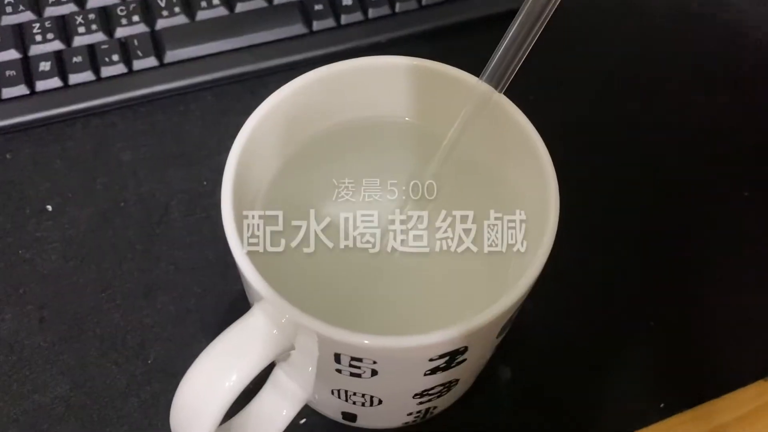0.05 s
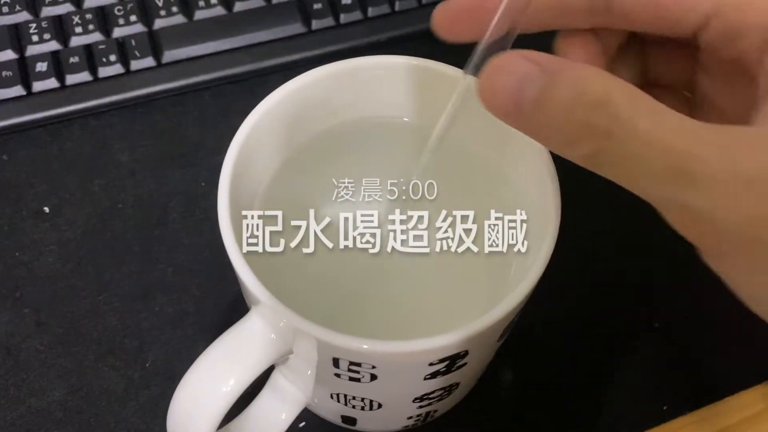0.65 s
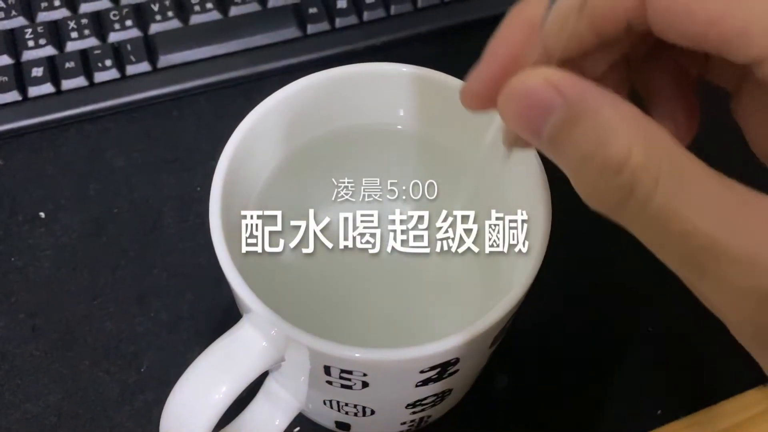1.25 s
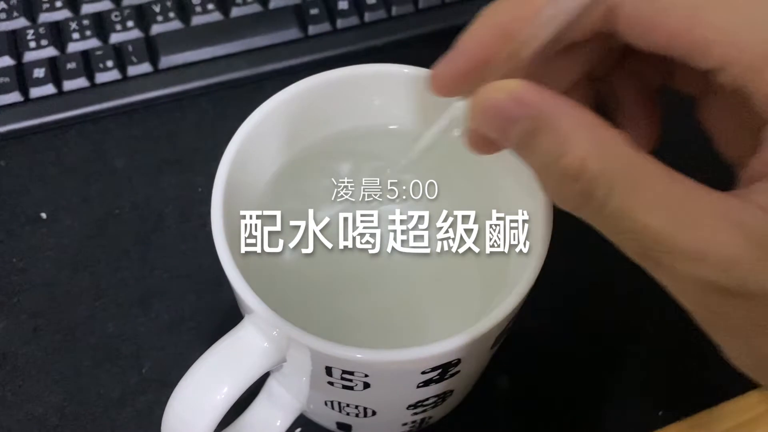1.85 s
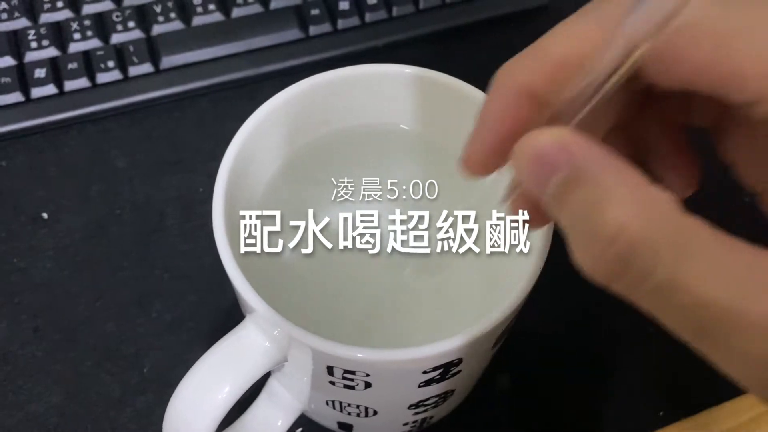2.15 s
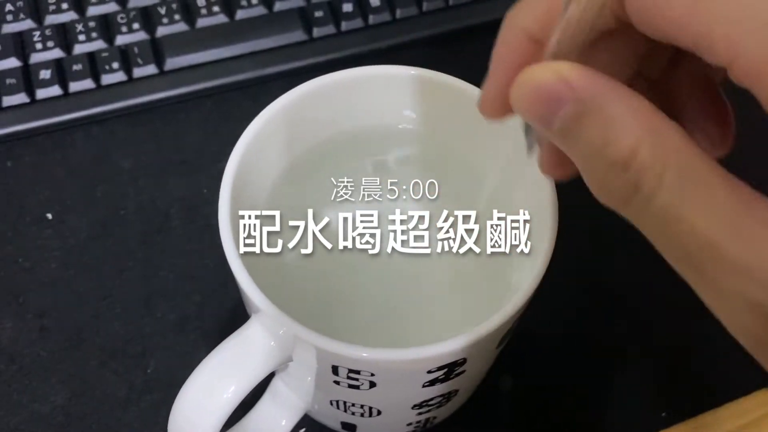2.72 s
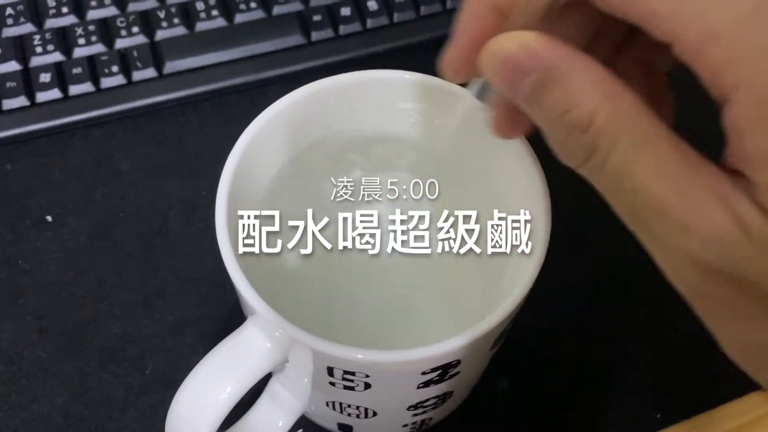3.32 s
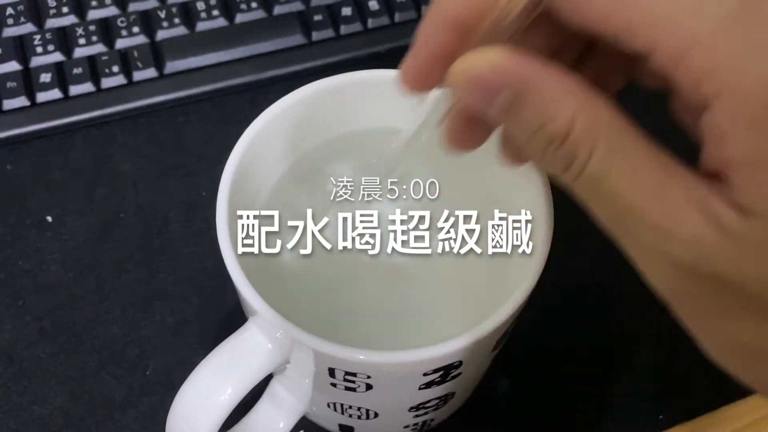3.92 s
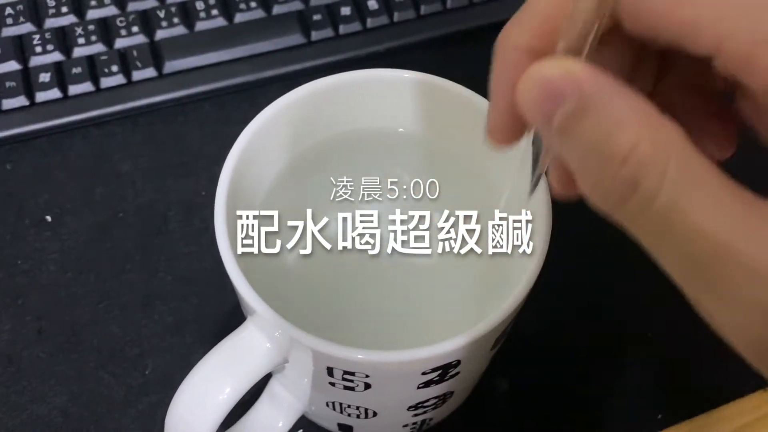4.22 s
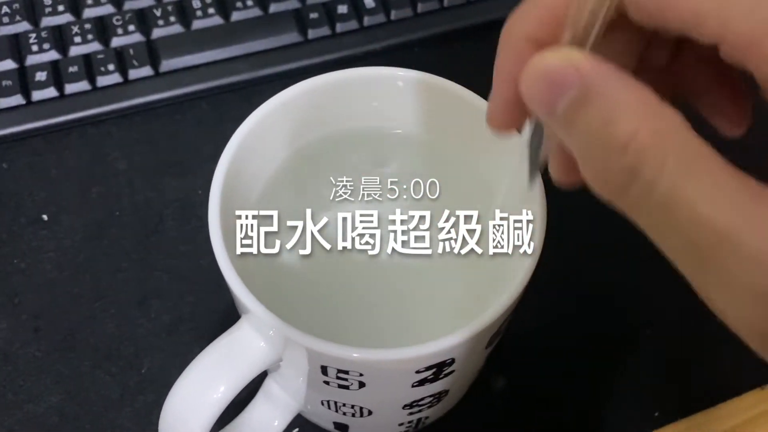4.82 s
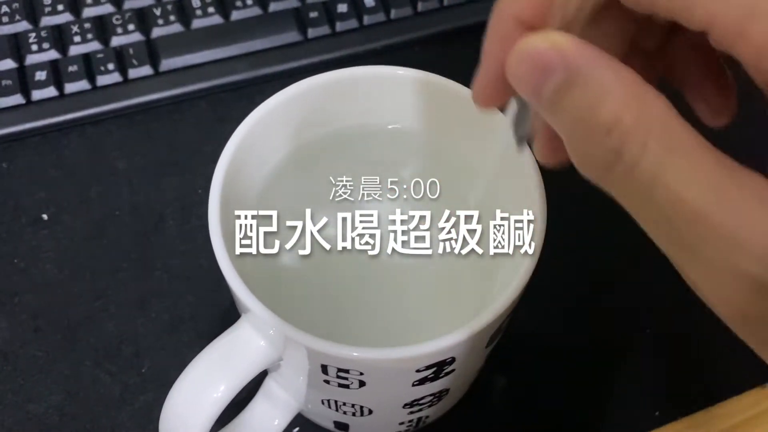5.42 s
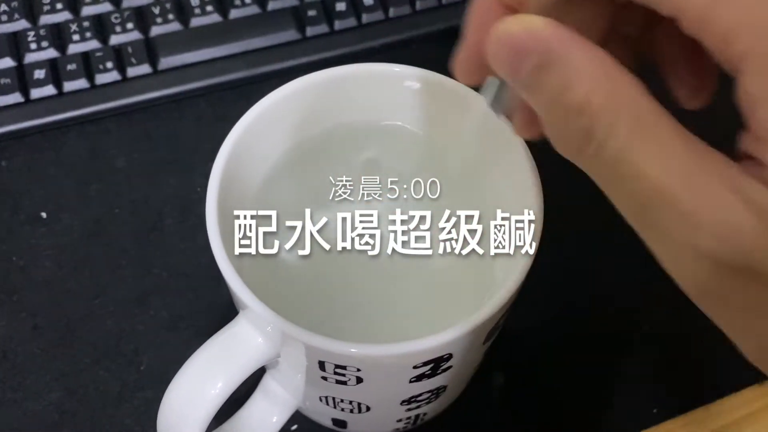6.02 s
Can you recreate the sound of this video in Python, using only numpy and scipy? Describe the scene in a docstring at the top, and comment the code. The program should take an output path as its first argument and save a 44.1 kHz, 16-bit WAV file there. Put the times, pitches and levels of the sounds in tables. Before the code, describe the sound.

Faint ventilation noise and electrical hum fill a quiet room, then a glass rod begins stirring in a ceramic mug close to the microphone. Light taps grow into a loose run of sharp, high clinks, some rattling briefly, each leaving the mug ringing. Soft scrapes and a few tiny squeaks come between the strikes as the stirring carries on. The water makes no splash and only wavers the ring slightly.

```python
"""A glass rod stirs water in a ceramic mug on a desk, close to a two-port microphone in a quiet room.
On each turn the rod knocks the wall or the rim, bounces, and drags along the glaze with a gritty rub
and an odd squeak. The hand-held rod rings only briefly; the mug rings on, with a beating pair of low
modes. The water is heard only as it sways and lowers the mug's pitch. Behind the mug lie short
reflections from desk and walls, low ventilation noise and a faint mains hum."""
import sys
import numpy as np
from scipy import signal
from scipy.fft import rfft, irfft
from scipy.io import wavfile

SR = 44100
rng = np.random.default_rng(int(sys.argv[2]) if len(sys.argv) > 2 else 0)


def pcm_store(signal):
    """Save signal as 16-bit PCM."""
    levels = np.round(np.clip(np.atleast_2d(signal), -1, 1) * 32767)
    wavfile.write(sys.argv[1], SR, levels.astype(np.int16).T)


N = 267246

# Blows of the rod on the wall, by its tip or by its side in soft taps, and of the shaft on the rim: start_s, #
# five times register_db (low to high), lower_oval_db, upper_oval_db, wall_db, waist_db, press (0 to 1)
WALL_BLOWS = [(0.905, -52.5, -65, -74, -71, -76, -56, -67, -66, -80, 0),
              (1.0347, -40, -45, -40.5, -47.5, -57, -54.5, -84, -45.5, -67, 0),
              (1.3075, -35.5, -45, -39, -50, -55, -43.5, -47, -34, -56, 1),
              (1.3881, -36, -43, -32, -42.5, -50, -41, -46, -31, -46.5, 0),
              (1.7776, -30, -40, -42.5, -59, -61, -46, -38.5, -39, -37.5, 0),
              (2.2218, -38.5, -60, -47.5, -57, -61, -52, -55, -47, -62, 0.9),
              (2.2813, -30.5, -25.5, -18, -28.5, -27.5, -41, -59, -33, -37, 0),
              (2.4494, -36, -44.5, -45.5, -61, -65, -45, -49, -39, -46, 0.017),
              (3.027, -37.5, -50, -55.5, -55, -59, -58.5, -47, -55.5, -56.5, 0.11),
              (3.1835, -46, -40.5, -43.5, -41.5, -45, -72, -46.5, -42, -45.5, 0.06),
              (3.7972, -35, -28, -21, -23.5, -27.5, -50.5, -45, -34, -42.5, 0.0082),
              (4.4785, -38.5, -29.5, -24, -22.5, -30, -59.5, -46.5, -49, -41, 0.19),
              (5.1257, -43, -34, -30, -28, -36.5, -58, -49, -50, -48.5, 0.14),
              (5.802, -40, -34, -29, -27, -32, -51.5, -55.5, -33.5, -47, 0)]
RIM_BLOWS = [(3.4159, -39.5, -55, -33.5, -38.5, -45.5, -39, -43, -41, -47.5, 0.6),
             (3.5303, -42.5, -39.5, -28.5, -38.5, -46, -48.5, -42.5, -41.5, -45, 0.056),
             (4.0548, -34, -37, -24.5, -26.5, -28, -30.5, -41, -41, -39, 1),
             (4.2625, -42.5, -40.5, -37, -40.5, -44.5, -43.5, -51.5, -44, -54, 0),
             (4.8272, -37.5, -46.5, -30, -33, -36.5, -59, -30.5, -39.5, -37, 1),
             (4.8648, -37, -38, -28, -32.5, -46, -41.5, -36, -32.5, -43, 0.31),
             (5.5234, -36.5, -37, -34.5, -31.5, -32.5, -41, -51, -37, -67, 0.47),
             (5.5436, -35.5, -35, -31, -32.5, -39, -40, -43.5, -47, -41, 0.88)]
# Rebounds of the rod, relative to the blow before: start_s, level_db
BOUNCES = [(2.3024, -9.5), (2.312, -9.5), (2.3177, -15.5), (3.2015, -1), (3.822, -7.5), (3.836, -15),
           (3.8444, -20.5), (3.8496, -18), (4.061, -9.5), (4.065, -12.5), (4.2815, -1.5), (4.5108, -11),
           (4.5352, -18), (4.876, -6), (5.1536, -6.5), (5.166, -15), (5.173, -14), (5.552, -4.5),
           (5.8226, -5), (5.8325, -14), (5.84, -12)]

def blows(rows, colour_db, lip_offset_db, rebound_dulling=0.28):
    """Each blow of the rod knocks, may rebound a little duller, and sets the mug ringing."""
    out = np.zeros(N)
    starts = np.array([row[0] for row in list(WALL_BLOWS) + list(RIM_BLOWS)] + [np.inf])
    for s, *registers_db, lower_db, upper_db, wall_db, waist_db, press in rows:
        next_s = starts[starts > s].min()
        rebounds = [row for row in BOUNCES if s < row[0] < next_s]
        loss_tilt = 1 + rebound_dulling * np.linspace(0, 1, len(registers_db))
        for at, db in [(s, 0)] + rebounds:
            add(out, at, knock(registers_db + db * loss_tilt, colour_db))
        lip_db = registers_db[2] + lip_offset_db
        add(out, s, oval_ring((lower_db, upper_db), press, s, next_s))
        add(out, s, high_ring((wall_db, waist_db, lip_db), press))
    return out


# Short modes of rod and mug in contact, levels relative: pitch_hz, t60_s, wall_blow_db, rim_blow_db
KNOCK_MODES = [(1150, .05, -19.5, -57), (1870, 0.00087, -14.5, -17.5), (3050, 0.012, -5.5, -12),
               (3540, 0.0063, -17, -15), (4086, 0.0055, -5.5, -19.5), (4866, 0.017, -17.5, -17.5),
               (6015, 0.035, -13, 0.5), (6305, 0.011, -1.5, 6.5), (7005, 0.013, -14.5, 2),
               (8350, 0.023, -14, 0.5), (9446, .02, -17, 0.5), (10060, .014, -2, -8.5),
               (10845, 0.0073, -10.5, -20), (14520, 0.012, 0, 0)]
# Bounds of the five registers of a knock: edge_hz
REGISTER_EDGES = (1050, 3600, 5500, 8800, 12800, 16000)

def knock(registers_db, colour_db, vary_db=2, crack_db=-11, crack_t60_s=0.0099, contact_s=.00045):
    """Glass meets ceramic: a crack and short modes in each register, detuned by the hand's grip."""
    hz, t60 = np.transpose(KNOCK_MODES)[:2]
    peak_db = colour_db + vary_db * rng.standard_normal(len(hz))
    gripped_hz = hz * (1 + .008 * rng.standard_normal(len(hz)))
    t = np.arange(3000) / SR
    out = np.zeros(len(t))
    for lo, hi, db in zip(REGISTER_EDGES, REGISTER_EDGES[1:], registers_db):
        inside = (hz > lo) & (hz < hi)
        modes = response(gripped_hz[inside], t60[inside], peak_db[inside], contact_s, size=len(t))
        crack = rng.standard_normal(len(t)) * gain_of(-60 * t / crack_t60_s)
        modes, crack = signal.lfilter(*signal.butter(2, (lo, hi), "band", fs=SR), [modes, crack])
        contact = even_attack(modes) + gain_of(crack_db) * even_attack(crack)
        out += gain_of(db) * even_attack(near_echoes(contact))
    return signal.lfilter(*signal.butter(2, REGISTER_EDGES[0], "high", fs=SR), out)


def near_echoes(x, echo_db=-12, count=7):
    """The inside of the mug, the hand and the desk return each knock within a few milliseconds."""
    out = x.copy()
    for s in np.linspace(.001, .006, count) * rng.uniform(.85, 1.15, count):
        add(out, s, x * gain_of(echo_db) * rng.choice([-1, 1]) / np.sqrt(count))
    return out


# The mug's oval mode, split in two by the handle: pitch_hz, t60_s, relative_db
OVAL_MODES = [(1879, 1.2, 0), (1973, 1.1, 0)]

def oval_ring(levels_db, press, start_s, next_s, damping_db_per_s=260, handover_s=0.02):
    """The low pair beats until the next blow takes over; a pressed rod damps and flattens it."""
    t = np.arange(SR) / SR
    handover = np.exp(-np.maximum(t - (next_s - start_s), 0) / handover_s)
    sag = 0.007 * press + 0.00085 * start_s  # the pitch also sinks as water swirls higher up the wall
    return handover * sum(ring([mode], db, rise_s=0.0024, damping_db_per_s=damping_db_per_s * press,
                               sag=sag) for mode, db in zip(OVAL_MODES, levels_db))


# Higher modes of the mug's wall, waist and lip: pitch_hz, t60_s, relative_db
WALL_MODES = [(4026, .16, -3), (4056, .11, -3)]
WAIST_MODES = [(4901, .28, 0), (5470, .28, -15)]
LIP_MODES = [(5965, .13, -17), (7574, .13, -14), (7792, .12, -3), (9598, .1, -12)]

def high_ring(levels_db, press, damping_db_per_s=60):
    """Wall, waist and lip ring briefly, shorter still under a pressed rod."""
    return sum(ring(modes, db, rise_s=0.0036, damping_db_per_s=damping_db_per_s * press)
               for modes, db in zip((WALL_MODES, WAIST_MODES, LIP_MODES), levels_db))


# Single modes of the lip that stand out: start_s, pitch_hz, level_db
LIP_NOTES = [(1.3881, 5965, -37.5), (2.2813, 5800, -46), (4.8272, 7760, -25), (5.5436, 6060, -32)]

def singing_lip(t60_s=0.16):
    """Some blows make one mode of the lip sing out."""
    out = np.zeros(N)
    for s, hz, db in LIP_NOTES:
        add(out, s, ring([(hz, t60_s, 0)], db, rise_s=0.0017))
    return out


def ring(modes, level_db, rise_s, damping_db_per_s=0, sag=0, slosh_depth=.0016, slosh_hz=4.5):
    """Modes of the mug die away while the sloshing water sways their pitch."""
    hz, t60, db = np.transpose(modes)
    t = np.arange(SR)[:, None] / SR
    pitch = 1 - sag + slosh_depth * np.sin(2 * np.pi * (slosh_hz * t + rng.random()))
    waves = np.sin(2 * np.pi * (hz * np.cumsum(pitch, axis=0) / SR + rng.random(len(hz))))
    decay = gain_of(level_db + db - (60 / t60 + damping_db_per_s) * t)
    return (decay * (1 - np.exp(-t / rise_s)) * waves).sum(1)


# Modes shaken by the dragging tip, and the one that squeaks: pitch_hz, t60_s, relative_db
RUB_MODES = [(1930, 0.0028, -6), (3066, 0.0051, -4), (4060, 0.14, -1), (3820, 0.0033, -6), (4910, 0.28, -4),
             (5550, 0.18, -10.5), (6245, 0.008, -3), (7800, 0.0016, -11), (9925, 0.017, -8.5),
             (14340, 0.011, -14)]
SQUEAK_MODE = [(3084, .02, 0)]
# The tip sticks and slips: start_s, length_s, level_db
SQUEAKS = [(1.34, 0.057, -49), (2.485, 0.029, -52), (4.638, 0.022, -56.5)]

def drag(coarse_db=-5, oval_db=-31, oval_follow=0.44, oval_t60_s=1.0):
    """Glass slips on glaze: fine slips make grit, coarse ones chatter lower down, one mode squeaks."""
    force_db = rubbing_force()
    fine = unit_rms(slips(per_s=3500, spread_db=3.0) * gain_of(3.2 * wander(per_s=140)))
    grit = sliding(fine * gain_of(force_db), RUB_MODES)
    chatter = sliding(slips(per_s=170, spread_db=1.0) * gain_of(coarse_db + force_db), RUB_MODES[:4])
    squeak = sliding(fine * swells(SQUEAKS), SQUEAK_MODE)
    # the rubbing also keeps the oval modes sounding
    oval_modes = [(mode[0], oval_t60_s, db) for mode, db in zip(OVAL_MODES, (-5, 0))]
    ringing = shaken(fine * gain_of(oval_db + oval_follow * force_db), oval_modes, size=30000)
    return grit + chatter + squeak + ringing


# The tip slides along the wall: start_s, length_s, force_db
STROKES = [(1.336, 0.088, -48), (1.491, 0.17, -53.5), (1.542, 0.026, -46.5), (1.873, 0.18, -67.5),
           (2.32, 0.057, -54.5), (2.46, 0.38, -59), (2.859, 0.075, -55.5), (3.216, .1, -58.5),
           (3.54, 0.084, -57), (3.827, .16, -53.5), (4.51, 0.16, -56.5), (4.877, 0.1, -55.5),
           (5.152, 0.16, -54), (5.556, 0.12, -52.5), (5.849, 0.032, -47.5), (5.937, .15, -62)]
# The tip catches on the glaze: start_s, force_db
CATCHES = [(1.362, -42.5), (1.499, -38), (2.811, -50), (3.982, -45.5), (4.683, -50.5), (5.306, -48),
           (5.341, -52)]

def rubbing_force(land_s=0.0012, settle_s=0.0092, ease_db_per_s=30.5, lift_db_per_s=298):
    """Force of the tip in dB: each stroke lands, eases off and lifts away; a catch is a brief surge."""
    force, t = np.zeros(N), np.arange(SR) / SR
    landing = np.minimum(t / land_s, 1)
    for s, length, db in STROKES:
        lift_db = lift_db_per_s * np.maximum(t - length, 0)
        add(force, s, landing * gain_of(db - ease_db_per_s * t - lift_db))
    for s, db in CATCHES:
        add(force, s, landing * gain_of(db) * np.exp(-t / settle_s))
    return 20 * np.log10(force + 1e-9)


def slips(per_s, spread_db):
    """The slipping tip gives random kicks of uneven size."""
    sizes = gain_of(spread_db * np.minimum(rng.exponential(1, N), np.pi)) * rng.choice([-1, 1], N)
    return unit_rms(sizes * (rng.random(N) < per_s / SR))


def sliding(kicks, modes, spots=8, spread_hz=130, spread_db=3):
    """From spot to spot of the glaze the damped modes shift in pitch and level; the long ones hold."""
    shares = np.exp([2 * wander(per_s=30) for _ in range(spots)])
    hz, t60, db = np.transpose(modes)
    out = np.zeros(N)
    for share in shares / np.linalg.norm(shares, axis=0):
        shift, shade = rng.standard_normal((2, len(hz))) * (t60 < .03)
        spot_modes = np.transpose([hz + spread_hz * shift, t60, db + spread_db * shade])
        out += shaken(kicks * share, spot_modes, size=8000)
    return out


# The rod sings under the drag: start_s, length_s, level_db
ROD_NOTES = [(1.32, 0.12, -61.5), (1.495, 0.12, -52), (3.029, 0.031, -55)]

def singing_rod(pitch_hz=1182, waver=0.0085):
    """The rod's lowest bending mode gives brief wavering tones."""
    hz = pitch_hz * (1 + waver * wander(per_s=71))
    return swells(ROD_NOTES) * np.sqrt(2) * np.sin(2 * np.pi * np.cumsum(hz) / SR)


# A faint hiss: start_s, length_s, level_db
HISS = [(.25, .5, -86.5)]
# Its resonance: pitch_hz, t60_s, relative_db
HISS_MODE = [(4500, 0.0067, 0)]

def faint_hiss():
    """A faint, soft breath-like hiss near 4.5 kHz before the stirring."""
    return shaken(rng.standard_normal(N) * swells(HISS), HISS_MODE, size=2000)


# The mug at the microphone, close by: frequency_hz, left_minus_right_db, left_lead_rad
PORT_CUES = [(1200, 1.7, .2), (1875, 1.6, -.8), (1970, 5.1, -.4), (3100, 7.5, .7), (4900, 6.5, -.2),
             (6300, 2.2, .35), (7000, 1.6, 0), (7790, .6, -1.2), (10200, 0, -4.9), (11200, .3, -6),
             (14500, 0, -5)]

def microphone_ports(x):
    """The direct sound reaches the two ports with unequal level and phase."""
    hz, table = np.fft.rfftfreq(2 * N, 1 / SR), np.array(PORT_CUES)
    left_gain = gain_of(curve_at(table[:, [0, 1]], hz) / 2)
    left_lead = np.exp(1j * curve_at(table[:, [0, 2]], hz))
    pair = np.array([left_gain * left_lead, 1 / left_gain])
    pair /= np.sqrt((left_gain ** 2 + left_gain ** -2) / 2)
    return irfft(rfft(x, 2 * N) * pair)[:, :N]


# Decay of the room around the desk: frequency_hz, t60_s
ROOM_DECAY = [(500, 0.13), (4000, 0.33), (15000, 0.019)]

def reflections(x, wet_db=-18, first_s=0.0031):
    """Sparse reflections from desk and walls, each band dying at its own speed."""
    taps = rng.standard_normal((2, SR // 2)) * (rng.random((2, SR // 2)) < .1)
    taps *= np.arange(SR // 2) / SR > first_s
    hz, t, bands = signal.stft(taps, SR, nperseg=256)
    decay = gain_of(-60 * t / curve_at(ROOM_DECAY, hz)[:, None])
    tail = signal.istft(bands * decay, SR, nperseg=256)[1]
    tail /= np.linalg.norm(tail, axis=1, keepdims=True)
    return gain_of(wet_db) * signal.fftconvolve(x[None], tail, axes=1)[:, :N]


# Spectrum of the ventilation: frequency_hz, relative_db
VENT_SPECTRUM = [(22, -50), (55, -1.5), (95, -6.5), (240, -10), (300, -15), (620, -15.5), (1900, -25),
                 (4000, -44), (16000, -63)]
# Its likeness at the two ports: frequency_hz, correlation (0 to 1)
VENT_LIKENESS = [(30, 1), (120, 0.88), (250, 0.68), (500, 0.087), (1000, 0.011)]
# Mains hum: pitch_hz, level_db
MAINS_HUM = [(120, -68), (239, -68.5)]

def room_tone(vent_db=-55.5, lean_left_db=1.0, hum_waver_rad=0.91):
    """Low ventilation noise, alike at both ports in the bass, and a faint mains hum."""
    hz, t = np.fft.rfftfreq(N, 1 / SR), np.arange(N) / SR
    left, independent = rfft(rng.standard_normal((2, N)))
    likeness = curve_at(VENT_LIKENESS, hz)
    right = likeness * left + np.sqrt(1 - likeness ** 2) * independent
    vent = unit_rms(irfft(np.array([left, right]) * gain_of(curve_at(VENT_SPECTRUM, hz)), N))
    hum = sum(gain_of(db) * np.sqrt(2) * np.sin(2 * np.pi * f * t + hum_waver_rad * wander(per_s=18))
              for f, db in MAINS_HUM)
    return (gain_of(vent_db) * vent + hum) * gain_of([[lean_left_db], [-lean_left_db]])


def response(hz, t60, peak_db, rise_s, size):
    """Impulse response of modes with relative resonance peaks peak_db; the force builds over rise_s."""
    t = np.arange(size)[:, None] / SR
    waves = np.cos(2 * np.pi * (hz * t + rng.random(len(hz))))
    decay = gain_of(peak_db - 60 * t / t60) / t60
    return (decay * (1 - np.exp(-t / rise_s)) * waves).sum(1)


def shaken(kicks, modes, size, slip_s=.001):
    """Slips or noise set a table of modes ringing."""
    body = response(*np.transpose(modes), slip_s, size=size)
    return signal.oaconvolve(kicks, body / np.linalg.norm(body))[:N]


def swells(rows):
    """Envelope of short rounded bursts."""
    level = np.zeros(N)
    for s, length, db in rows:
        add(level, s, gain_of(db) * signal.windows.tukey(round(length * SR), .7))
    return level


def wander(per_s):
    """Smooth random drift of rms 1."""
    hz = np.fft.rfftfreq(N, 1 / SR)
    return unit_rms(irfft(rfft(rng.standard_normal(N)) * np.exp(-(hz / per_s) ** 2), N))


def even_attack(sound):
    """Scales a knock to rms 1 over its first 5 ms."""
    return sound / np.sqrt(np.mean(sound[:220] ** 2))


def unit_rms(x):
    return x / np.sqrt(np.mean(x ** 2) + 1e-20)


def gain_of(db):
    return 10 ** (np.asarray(db) / 20)


def curve_at(points, hz):
    """Joins rows of (frequency_hz, value) on a log-frequency axis."""
    f, value = np.transpose(points)
    return np.interp(np.log(hz + 1), np.log(f), value)


def add(mix, s, sound):
    """Mixes a sound in at time s."""
    part = mix[round(s * SR):][:len(sound)]
    part += sound[:len(part)]


def scene():
    """The stirred mug close to the microphone, with the quiet room behind it."""
    tip_colour_db, rim_colour_db = np.transpose(KNOCK_MODES)[2:]
    mug = blows(WALL_BLOWS, tip_colour_db, lip_offset_db=-30)
    mug += blows(RIM_BLOWS, rim_colour_db, lip_offset_db=-4)
    mug += singing_lip() + drag() + singing_rod() + faint_hiss()
    return microphone_ports(mug) + reflections(mug) + room_tone()


def record(dry):
    """The recorder's band limit cuts the top treble."""
    lowpass = signal.firwin(511, cutoff=16700, window=("kaiser", 9), fs=SR)
    return signal.oaconvolve(dry, lowpass[None], "same")


dry = scene()
out = record(dry)
pcm_store(out)
```